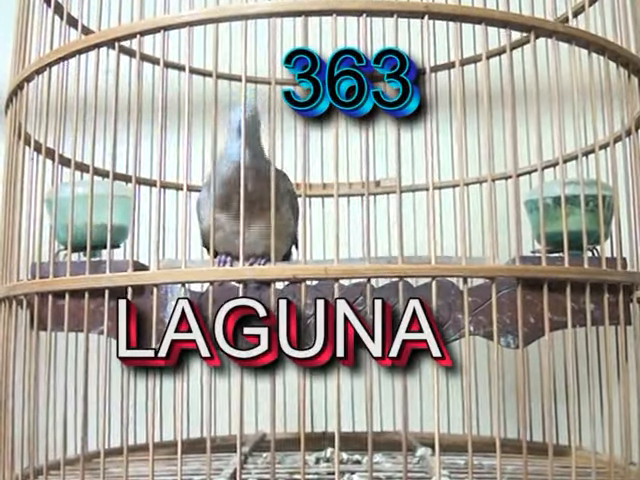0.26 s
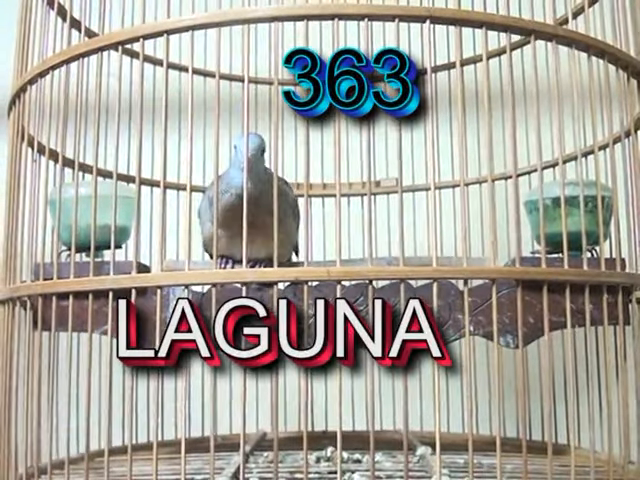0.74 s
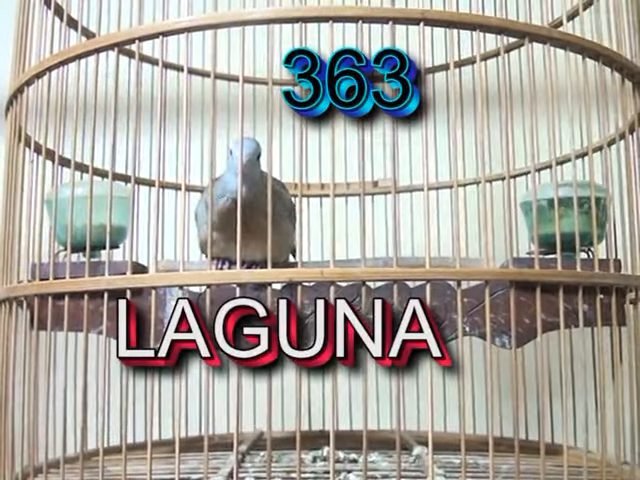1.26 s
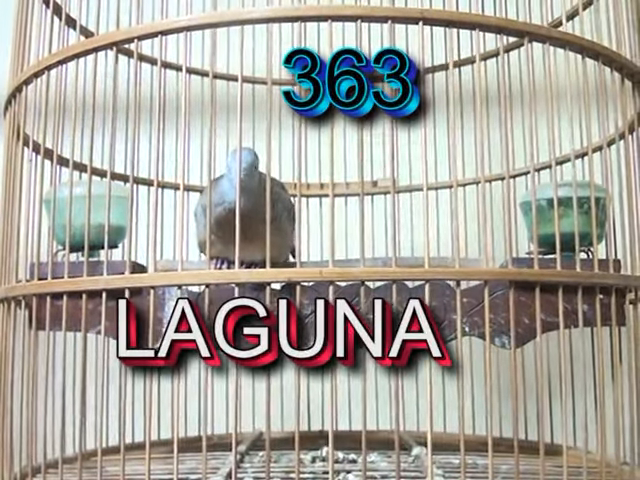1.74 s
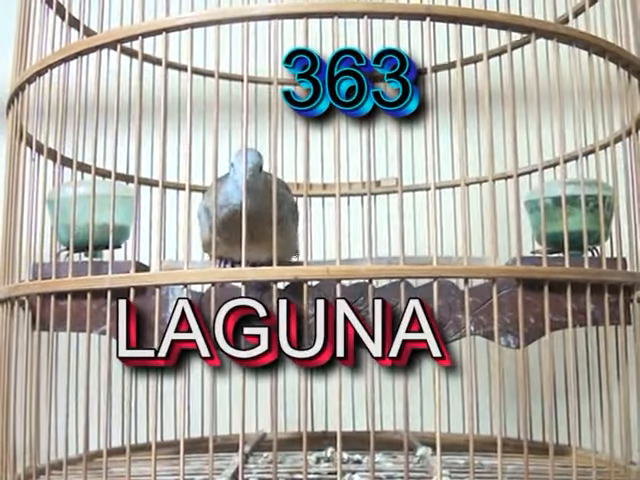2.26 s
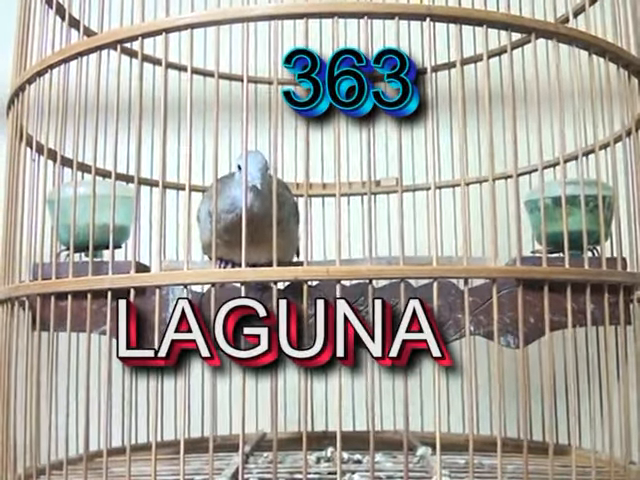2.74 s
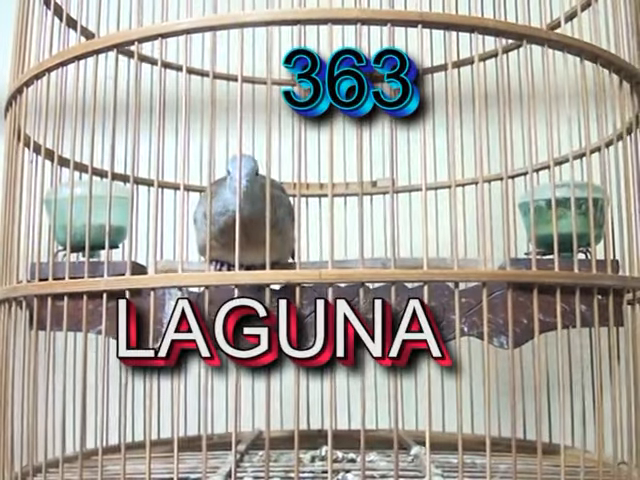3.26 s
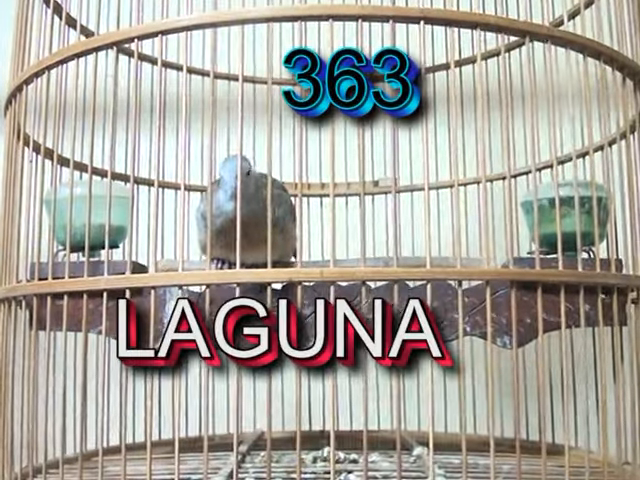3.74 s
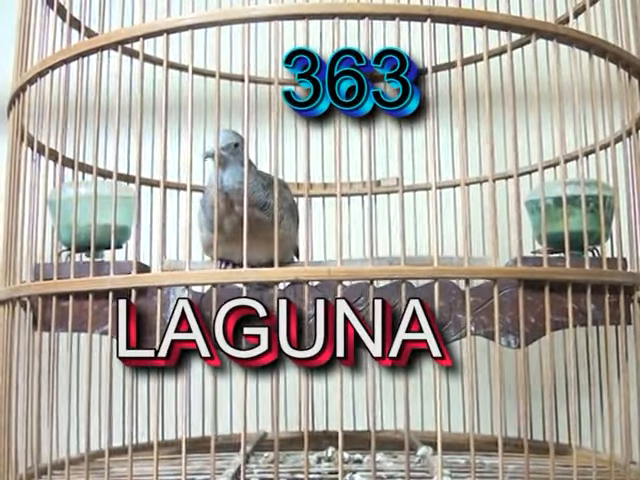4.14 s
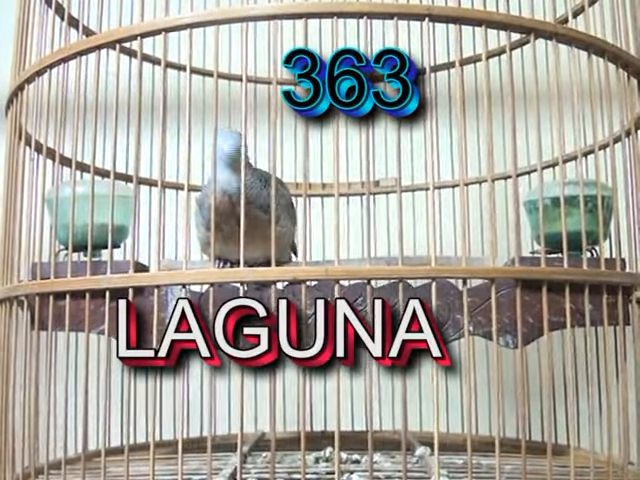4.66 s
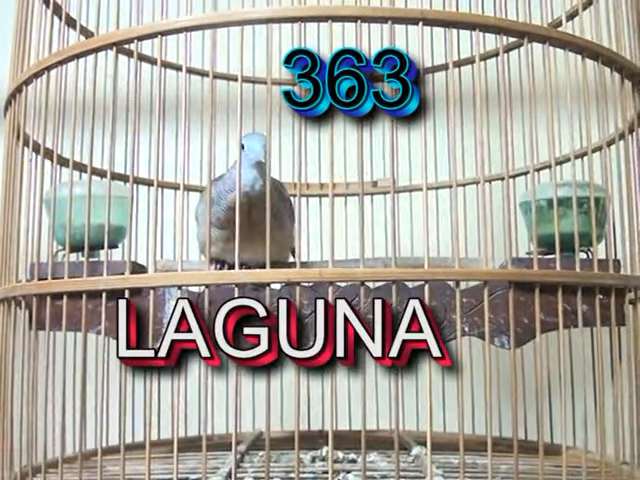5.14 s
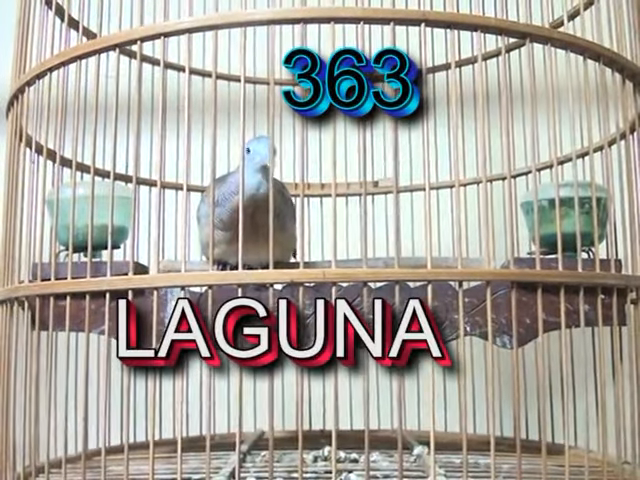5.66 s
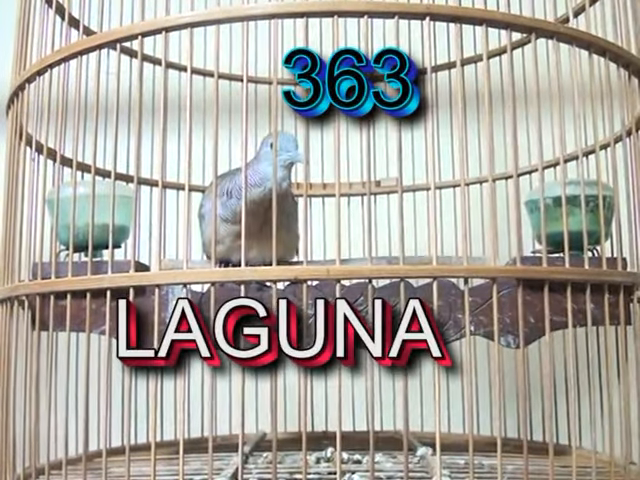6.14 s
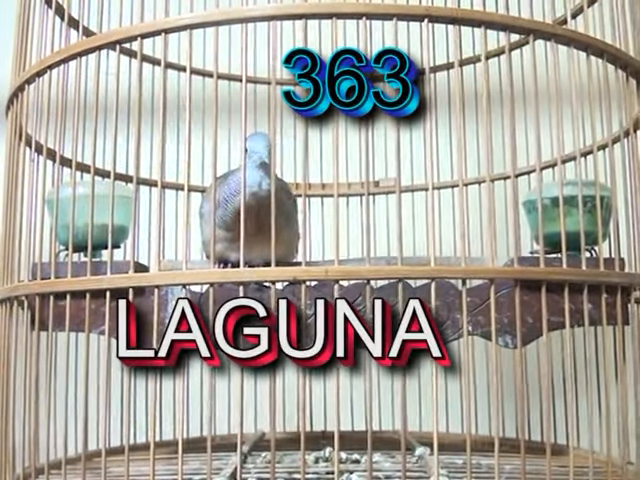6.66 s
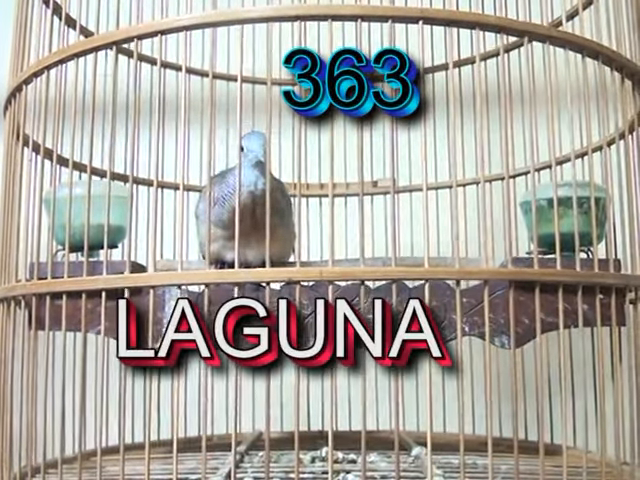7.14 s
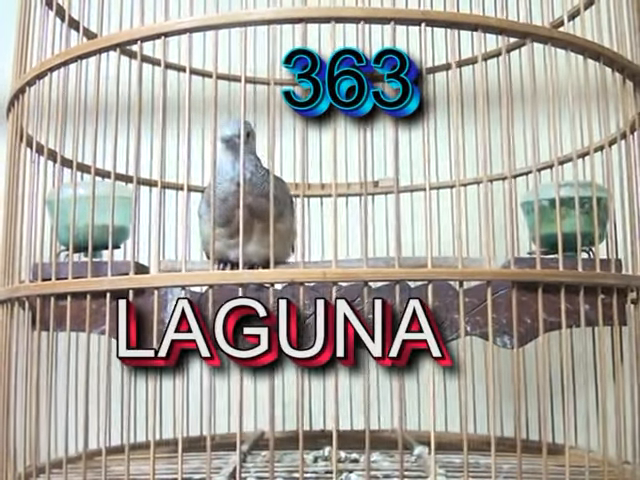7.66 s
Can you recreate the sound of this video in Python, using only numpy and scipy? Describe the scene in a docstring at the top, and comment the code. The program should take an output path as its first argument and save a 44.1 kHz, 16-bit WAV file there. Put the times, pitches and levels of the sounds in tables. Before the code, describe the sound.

A caged dove sings close to the microphone in a small, hard-walled room that adds a short echo. At about 0.5 seconds it gives one slightly rough note that rises and falls. From 1 to 6 seconds comes a run of seventeen short, arched coos, clear and almost pure in tone, each starting with a tiny creak. They begin at nearly four a second and gradually slow, becoming a little lower, flatter and softer. At 6.3 seconds the dove holds a longer coo that fades and lifts slightly, then adds two soft falling notes just before 7 seconds. Other doves call faintly in the distance at the very start, between 5 and 6 seconds, and around 7.5 seconds. Underneath, until the end at about 8 seconds, lie a quiet low rumble with occasional engine-like drones, steady hiss and a barely audible high electrical whistle.

```python
"""Caged zebra dove in a small, hard-walled room

One phrase: a rising opening note, 17 arched coos that slow and flatten, a long coo, a soft two-note
ending. Syrinx and swollen crop give a near-pure tone with weak overtones and rasp; flapping membranes
creak before it catches. Walls echo and the cage bars scatter the treble. Behind: faint far doves,
low rumble and drones, hiss and a thin electrical whistle."""
import sys
import numpy as np
from scipy import signal
from scipy.fft import rfft, irfft, next_fast_len
from scipy.io import wavfile
from scipy.ndimage import map_coordinates

SR = 44100
rng = np.random.default_rng(int(sys.argv[2]) if len(sys.argv) > 2 else 0)


def master_out(mix):
    """Clip the mix to full scale and print it as 16-bit PCM to the path in sys.argv[1]."""
    frames = np.transpose(np.atleast_2d(mix))
    ceiling = np.clip(frames, -1, 1)
    pcm = np.round(ceiling * 32767).astype(np.int16)
    wavfile.write(sys.argv[1], SR, pcm)


N = 348081

# held-note contours: time_s, pitch_hz, level_db
OPENING_CONTOUR = [(.453, 800, -18.5), (.49, 823, -16.5), (.53, 892, -11), (.563, 961, -9.5),
                   (.573, 1092, -11.5), (.603, 1137, -14.5), (.636, 1014, -14), (.664, 918, -12.5),
                   (.679, 694, -23.5)]
LONG_COO_CONTOUR = [(6.321, 783.5, -17.5), (6.365, 815.3, -16), (6.42, 819, -16), (6.46, 811.4, -18),
                    (6.518, 818, -21), (6.57, 829.7, -20.5), (6.662, 825.7, -22.5), (6.691, 855.5, -23),
                    (6.726, 875, -29)]
# run of coos: start_s, end_s, top_hz, peak_db
COO_RUN = [ (0.981, 1.044, 887, -10.5), (1.252, 1.326, 901.7, -9.5), (1.509, 1.593, 907.4, -10),
           (1.781, 1.87, 923.5, -9.5), (2.054, 2.145, 895.4, -10), (2.323, 2.421, 903.2, -9.5),
           (2.594, 2.698, 891.4, -10.5), (2.884, 2.986, 877.3, -11), (3.156, 3.259, 873.6, -11),
           (3.464, 3.571, 871.6, -11), (3.765, 3.875, 860, -12.5), (4.077, 4.192, 843, -12.5),
           (4.418, 4.533, 841.7, -13), (4.725, 4.845, 839.9, -13.5), (5.089, 5.236, 825.9, -13.5),
           (5.526, 5.654, 826.5, -14), (5.876, 6.004, 824.6, -15)]
# falling end notes: start_s, end_s, first_hz, last_hz, level_db
END_NOTES = [(6.815, 6.895, 1111, 1009, -31.5), (6.899, 6.954, 855, 828, -23)]
# creaks into the opening note and long coo: catch_s, level_db, flap_count
HELD_CREAKS = [(.459, -21, 9), (6.329, -24, 8)]
# overtone path through throat and closed beak, wider for the opening note: freq_hz, gain_db
THROAT_RESPONSE = [(1300, -43), (1620, -34), (1800, -44.5), (2350, -49), (2700, -44), (3150, -55.5),
                   (3550, -56), (4200, -63.5), (5000, -66.5), (5800, -63.5), (6450, -58.5), (7200, -72),
                   (10000, -79), (14000, -86)]
WIDE_THROAT_RESPONSE = [(1620, -31), (1900, -43.5), (2300, -40), (2600, -41.5), (3400, -50.5), (3900, -54),
                        (4600, -66), (5200, -68), (5800, -69.5), (7000, -77.5), (14000, -88)]
# wall and floor echoes at each microphone: delay_ms, gain_db
LEFT_ECHOES = [(2.1, -26), (5.95, -3.5), (14.9, -10), (24.09, -14.5), (39.8, -16), (48.13, -11),
               (56.23, -14.5), (64.26, -11.5), (81.12, -23.5), (109.97, -31)]
RIGHT_ECHOES = [(2.59, -12.5), (5.99, -1), (6.87, -10.5), (13.99, -9), (24.13, -11.5), (39.94, -12.5),
                (51.68, -7), (63.18, -6), (82.36, -11.5), (92.67, -19)]
# decay of room and cage: freq_hz, t60_s
ROOM_DECAY = [(300, 0.87), (900, 0.5), (2500, 0.56), (6500, 0.76), (14000, 0.15)]
CAGE_DECAY = [(1000, 0.32), (14000, 0.037)]
# far doves: start_s, end_s, first_hz, last_hz, level_db
FAR_COOS = [(0, .09, 1270, 1257, -54.5), (.25, .4, 836, 813, -52), (4.97, 5.209, 735, 697, -39),
            (5.33, 5.52, 720, 697, -47.5), (5.355, 5.568, 1345, 1245, -52), (5.652, 5.864, 707, 679, -49),
            (5.807, 6.254, 1254, 1223, -53.5), (7.396, 7.633, 1296, 1246, -55)]
# noise shapes: freq_hz, relative_density_db
RASP_SPECTRUM = [(400, -15.5), (900, 3.5), (2600, -6.5), (4200, -14), (6200, -12), (8000, -25),
                 (14000, -25.5)]
RUMBLE_SPECTRUM = [(12, -16.5), (22, 5.5), (33, -3.5), (50, 3.5), (72, 1), (105, -7), (135, -9),
                   (200, -35.5), (350, -120)]
AIR_SPECTRUM = [(65, -40), (110, -6.5), (135, -14), (165, -2.5), (215, -9), (285, -1.5), (350, -8),
                (430, -3.5), (540, -7.5), (700, -7), (1250, -5.5), (1660, -11.5), (2100, -11.5),
                (4000, -21), (6450, -26), (15000, -27.5)]
# left-right likeness of rumble and air: freq_hz, correlation
NOISE_CORRELATION = [(60, .82), (200, 0.45), (600, 0.72), (2500, 0.47), (5000, 0.13), (8000, 0.98),
                     (14000, 1)]
# low drones: start_s, end_s, pitch_hz, level_db
DRONE_TONES = [(0, .38, 77.2, -44), (3.007, 4.046, 57.16, -45), (3.805, 4.7, 60.6, -47),
               (5.094, 5.552, 81.5, -52), (5.852, 6.208, 100.8, -52)]
# line-scan whistle with mains sidebands: freq_hz, level_db
WHISTLE_TONES = [(11698, -80), (15127, -77), (15525, -73), (15575, -71), (15625, -60), (15675, -72)]

EASY_HZ, EASY_DB = 812.4, -14  # unforced voice; strain grows above this pitch
CATCH_HZ, FULL_COO_S, HURRY_HZ_PER_S = 789.8, .113, 1150  # shorter coos catch lower
FILL_S, SWELL_DB = .084, 5
CLOSE_S, SAG_DB, DROP_PER_HZ, MAX_DROP_HZ = .021, 3.9, 2.8, 152


def dove():
    """Whole phrase; all but the end notes open with a creak."""
    song = np.zeros(N)
    opening = held_note(OPENING_CONTOUR, WIDE_THROAT_RESPONSE, force_db_per_hz=.0296)
    add(song, OPENING_CONTOUR[0][0], opening)
    add(song, LONG_COO_CONTOUR[0][0], held_note(LONG_COO_CONTOUR, THROAT_RESPONSE))
    for start_s, end_s, top_hz, peak_db in COO_RUN:
        add(song, start_s, coo(end_s - start_s, top_hz, peak_db))
        lead_s, flaps = creak(level_db=-20.5 - 1.5 * start_s, gap_ratio=1.22, count=6)
        add(song, start_s - lead_s + .002, flaps)
    for start_s, end_s, first_hz, last_hz, level_db in END_NOTES:
        contour = [(start_s, first_hz, level_db), (end_s, last_hz, level_db)]
        add(song, start_s, held_note(contour, THROAT_RESPONSE))
    for catch_s, level_db, count in HELD_CREAKS:
        lead_s, flaps = creak(level_db, gap_ratio=1.16, count=count)
        add(song, catch_s - lead_s, flaps)
    return song


def coo(length_s, top_hz, peak_db, force_db_per_hz=.0156):
    """Pitch and level climb as the crop fills, drop as the pressure lets go."""
    t = np.arange(0, length_s, 1 / SR)
    unfilled = np.clip(1 - t / min(FILL_S, length_s - CLOSE_S), 0, 1)
    closing = np.clip(1 - (length_s - t) / CLOSE_S, 0, 1)
    first_hz = CATCH_HZ - HURRY_HZ_PER_S * max(FULL_COO_S - length_s, 0)
    drop_hz = np.clip(DROP_PER_HZ * (top_hz - EASY_HZ), 0, MAX_DROP_HZ)
    pitch_hz = top_hz - (top_hz - first_hz) * unfilled ** 1.5 - drop_hz * closing ** 2.61
    tone = amp(peak_db - SWELL_DB * unfilled ** 2.8 - SAG_DB * closing ** 2)
    drive = overtone_drive(t, peak_db, top_hz, force_db_per_hz)
    return syrinx(t, pitch_hz, tone, drive, roughness(top_hz), THROAT_RESPONSE)


def held_note(contour, throat, force_db_per_hz=0):
    """Note on a pitch and level contour, which also sets overtones and roughness."""
    time_s, *columns = np.transpose(contour)
    t = np.arange(0, time_s[-1] - time_s[0], 1 / SR)
    pitch_hz, level_db = [np.interp(time_s[0] + t, time_s, column) for column in columns]
    drive = overtone_drive(t, level_db, pitch_hz, force_db_per_hz)
    return syrinx(t, pitch_hz, amp(level_db), drive, roughness(pitch_hz), throat)


def syrinx(t, pitch_hz, tone, drive, rough, throat, attack_s=.0074, release_s=.008):
    """Near-pure tone from the swollen crop, with weak overtones and a little rasp."""
    n = len(t)
    gate = np.clip(t / attack_s, 0, 1) * np.clip((t[-1] - t) / release_s, 0, 1)
    tone, drive = gate * tone, gate * drive
    pitch_hz = pitch_hz - 137 * np.exp(-t / .002)  # scoop from below
    jitter = .017 * rough * wobble(450, n)
    phase = 2 * np.pi * np.cumsum(pitch_hz * (1 + jitter)) / SR
    overtones = np.zeros(n)
    for k in range(2, 15):  # higher overtones: more drive-dependent, less steady
        growth = (drive + 1e-6) ** (min(k, 8) / 10)
        flutter_db = .48 * min(k - 1, 7) * wobble(90, n)
        drift_rad = (k / 11) ** 2 * wobble(120, n)
        overtones += growth * amp(along(throat, k * pitch_hz) + flutter_db) * np.sin(k * phase + drift_rad)
    turbulence = rng.standard_normal(n) * (1 + np.sin(phase))  # one puff per cycle
    rasp = unit_rms(filtered(turbulence, lambda hz: amp(along(RASP_SPECTRUM, hz))))
    return np.sqrt(2) * (tone * np.sin(phase) + drive * overtones) + amp(-37) * drive * rough * rasp


def overtone_drive(t, level_db, pitch_hz, force_db_per_hz):
    """Overtones bite at the onset and grow with level and forced pitch."""
    bite_db = 2.5 * np.exp(-t / .023)
    force_db = force_db_per_hz * (pitch_hz - EASY_HZ)
    return amp(-3 + .42 * (level_db - EASY_DB) + bite_db + force_db)


def roughness(pitch_hz):
    """Low notes are clean, strained high ones rough."""
    return np.interp(pitch_hz, [EASY_HZ, EASY_HZ + 170], [.089, .36])


def creak(level_db, gap_ratio, count, last_gap_s=.00145, ring_hz=930, rise_s=.00085, growth_db=8):
    """Membranes flap ever faster and harder, each flap ringing the crop. Returns lead_s, sound."""
    t = np.arange(SR // 20) / SR
    flaps_left = np.arange(count)
    gaps_s = last_gap_s * gap_ratio ** flaps_left * np.exp(.04 * rng.standard_normal(count))
    leads_s = np.cumsum(gaps_s)
    onsets_s = leads_s[-1] - leads_s[:, None]
    age = np.maximum(t - onsets_s, 0) / rise_s
    rings = age ** 3 * np.exp(3 * (1 - age)) * np.sin(2 * np.pi * ring_hz * rise_s * age)
    return leads_s[-1], amp(level_db - growth_db * flaps_left / count) @ rings


def walls(song, echoes):
    """Early reflections; overtones are beamed forward and return weaker."""
    def response(hz):
        taps = sum(amp(db) * np.exp(-2j * np.pi * hz * delay_ms / 1000) for delay_ms, db in echoes)
        return amp(along([(1250, 0), (1550, -7)], hz)) * taps
    return filtered(song, response)


def cage_bars(song, corner_hz=3200):
    """Bars scatter only the short waves."""
    treble = filtered(song, lambda hz: hz ** 3 / (hz ** 3 + corner_hz ** 3))
    return reverberation(treble, CAGE_DECAY, build_s=.002, shared=0)


def reverberation(x, decay, build_s, shared):
    """Diffuse stereo tail: swells, then each band dies at its own rate."""
    hz, t, noise = signal.stft(rng.standard_normal((2, SR)), SR, nperseg=256)
    envelope = amp(-60 * t / along(decay, hz)[:, None]) * np.clip(t / build_s, 0, 1) ** 3
    mid, side = signal.istft(noise * envelope, SR, nperseg=256)[1]
    tail = np.array([mid + (1 - shared) * side, mid - (1 - shared) * side])
    return signal.fftconvolve(x[None], tail / np.linalg.norm(tail[0]), axes=1)[:, :N]


def far_doves():
    """Soft, falling coos from further off."""
    calls = np.zeros(N)
    for start_s, end_s, first_hz, last_hz, level_db in FAR_COOS:
        n = round((end_s - start_s) * SR)
        pitch_hz = np.linspace(first_hz, last_hz, n) * (1 + .0027 * wobble(45, n))
        phase = 2 * np.pi * np.cumsum(pitch_hz) / SR
        add(calls, start_s, amp(level_db) * signal.windows.tukey(n, .5) * np.sin(phase))
    return calls


def rumble(level_db=-48, swell_db=.6):
    """Low noise with slow swells."""
    return amp(level_db + swell_db * wobble(1.2, N)) * stereo_noise(RUMBLE_SPECTRUM)


def drones():
    """Wavering low tones, as of distant engines."""
    track = np.zeros(N)
    for start_s, end_s, pitch_hz, level_db in DRONE_TONES:
        n = round((end_s - start_s) * SR)
        phase = 2 * np.pi * pitch_hz * np.arange(n) / SR + .7 * wobble(13, n)
        add(track, start_s, amp(level_db) * signal.windows.tukey(n, .3) * np.sin(phase))
    return track


def air(level_db=-47.5):
    """Steady broadband hiss."""
    return amp(level_db) * stereo_noise(AIR_SPECTRUM)


def whistle():
    """Thin line-scan whistle, wavering in level."""
    t = np.arange(N) / SR
    tones = sum(amp(db) * np.sin(2 * np.pi * (hz * t + rng.random())) for hz, db in WHISTLE_TONES)
    return np.sqrt(2) * tones * (1 + .25 * wobble(110, N))


def stereo_noise(spectrum):
    """Coloured noise, partly alike in both channels; mid rms 1."""
    def response(hz):
        angle = np.arccos(np.clip(along(NOISE_CORRELATION, hz), -1, 1)) / 2
        return amp(along(spectrum, hz)) * np.array([np.cos(angle), np.sin(angle)])
    mid, side = filtered(rng.standard_normal((2, N)), response)
    return np.array([mid + side, mid - side]) / np.std(mid)


def amp(db):
    return 10 ** (np.asarray(db) / 20)


def unit_rms(x):
    return x / np.sqrt(np.mean(x ** 2) + 1e-20)


def along(points, hz):
    """Interpolate (freq_hz, value) points on a log axis."""
    freq_hz, values = np.transpose(points)
    return np.interp(np.log(hz + 1), np.log(freq_hz + 1), values)


def wobble(rate_hz, n):
    """Smooth random curve, n samples."""
    return map_coordinates(rng.standard_normal(SR // 4), [np.arange(n) * rate_hz / SR], mode="wrap")


def filtered(x, response):
    """Apply response(hz) by FFT."""
    n = x.shape[-1]
    size = next_fast_len(n + 8192)
    return irfft(rfft(x, size) * response(np.fft.rfftfreq(size, 1 / SR)), size)[..., :n]


def add(track, start_s, sound):
    part = track[max(round(start_s * SR), 0):][:len(sound)]
    part += sound[:len(part)]


def scene():
    """Dove, room and cage at two close microphones, over far doves and background."""
    song, far = dove(), far_doves()
    near = np.array([song + walls(song, LEFT_ECHOES), song + walls(song, RIGHT_ECHOES)])
    arrival_s = np.array([[0], [30e-6]])
    near = amp([[-.4], [-2.3]]) * filtered(near, lambda hz: np.exp(-2j * np.pi * hz * arrival_s))
    late = amp([[-15.5], [-13.5]]) * reverberation(song, ROOM_DECAY, build_s=.12, shared=.4)
    scatter = amp([[1.5], [0]]) * cage_bars(song)
    distant = far + amp(-3) * reverberation(far, ROOM_DECAY, build_s=.05, shared=.6)
    return near + late + scatter + distant + rumble() + drones() + air() + whistle()


def record(dry, top_hz=15850):
    """Brick-wall band limit."""
    return filtered(dry, lambda hz: hz < top_hz)


dry = scene()
out = record(dry)
master_out(out)
```